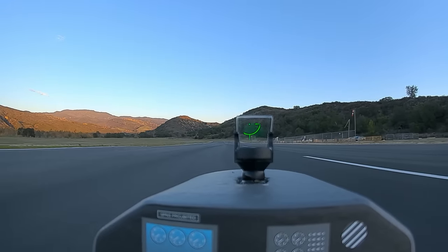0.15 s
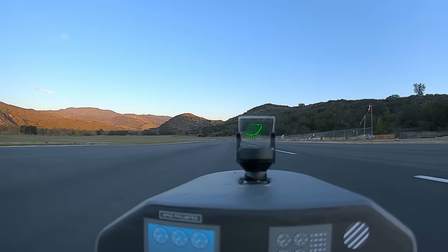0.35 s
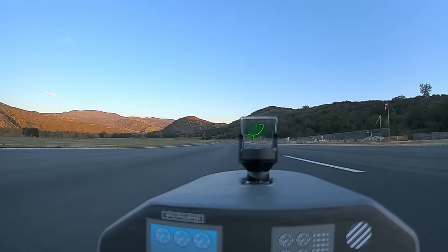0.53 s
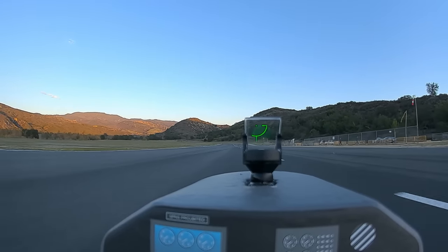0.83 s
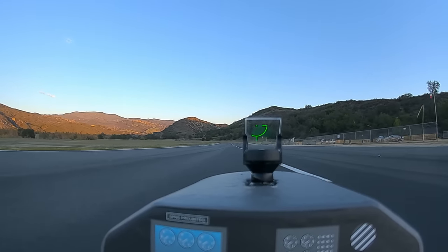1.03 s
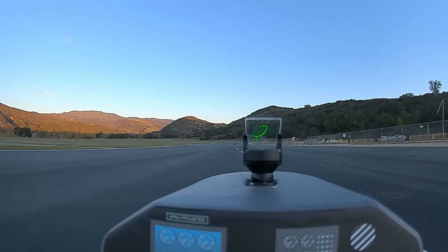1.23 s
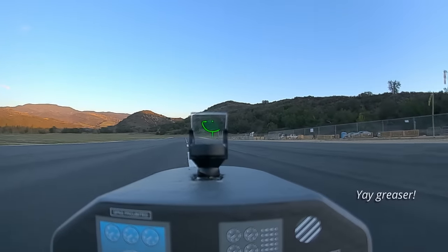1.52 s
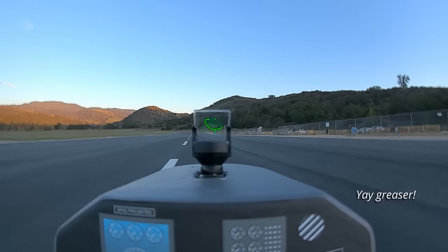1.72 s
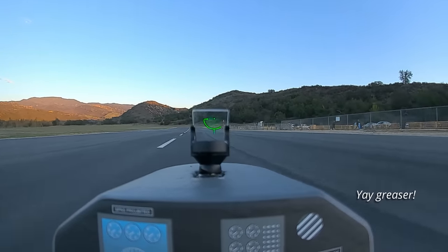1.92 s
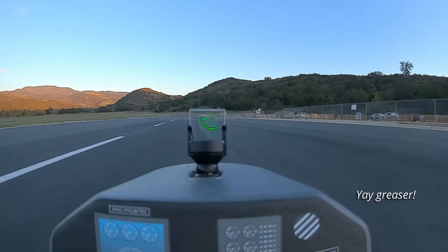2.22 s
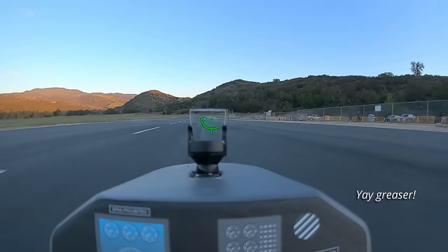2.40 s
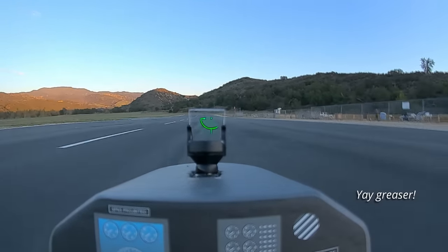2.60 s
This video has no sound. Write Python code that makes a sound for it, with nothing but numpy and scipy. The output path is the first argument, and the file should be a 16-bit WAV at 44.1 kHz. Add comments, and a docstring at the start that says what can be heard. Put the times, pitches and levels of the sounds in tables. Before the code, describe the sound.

Heard from inside a small model plane's hull outdoors, rapid low thumps of wheels skimming pavement turn into continuous gritty rolling, with ticking loose parts, faint air hiss, and hard jolts late on.

```python
"""Model jet landing, heard from inside

A small model jet lands on a rough paved runway, heard by a microphone inside its airframe. The wheels skip
about ten times a second, make their last skips up to about 1.8 s, then roll on unevenly without a break:
dense pushes of grit ring the hull modes, and bumps knock them. Loose parts tick, rattle and chatter as short
noise bursts and filtered random clicks. A faint airflow hiss of filtered noise, with a thin whistle in it,
lies under it all."""
import sys
import numpy as np
from scipy import signal
from scipy.io import wavfile

SR = 44100
rng = np.random.default_rng(int(sys.argv[2]) if len(sys.argv) > 2 else 0)


def transcribe(signal):
    """Save signal, clipped to [-1, 1], as a 16-bit WAV file at the path in sys.argv[1]."""
    frames = np.atleast_2d(signal).T
    limited = np.clip(frames, -1, 1)
    pcm = np.round(limited * 32767).astype(np.int16)
    wavfile.write(sys.argv[1], SR, pcm)


N = 121275  # length of the scene in samples

# Bumps that knock the gear. Each row: time of the peak in seconds, peak level in dB, contact length in ms.
KNOCK_EVENTS = [(0.157, -31.5, 3.2), (0.1808, -33.5, 1.36), (0.2082, -40.5, 4.3), (0.228, -44, 6.8),
                (0.3063, -30.0, 2), (0.3198, -30, 3.1), (0.3295, -35.0, 2.4), (0.4157, -36, 1.2),
                (0.4243, -29.5, 2.0), (0.4334, -33.5, 3.7), (0.4509, -34, 2.3), (0.523, -39, 3.5),
                (0.5362, -34.5, 2.7), (0.5503, -33, 2.7), (0.6087, -35.5, 1.9), (0.619, -33.5, 3.2),
                (0.627, -42, 1.5), (0.6377, -36, 2), (0.6517, -34, 3.1), (0.7698, -34, 2.1),
                (0.782, -49, 1.5), (0.8364, -36.5, 2.3), (0.8573, -38, 2.6), (0.8756, -41.0, 3.5),
                (0.9606, -37.0, 2.7), (0.974, -37.5, 4.7), (0.989, -46, 4.2), (1.045, -39.5, 4.3),
                (1.0746, -38, 0.89), (1.0885, -38, 1.4), (1.1499, -43, 7), (1.1662, -31.5, 4.5),
                (1.186, -36.5, 1.9), (1.2068, -42.5, 3.3), (1.2256, -40, 2.1), (1.2691, -29.5, 1.7),
                (1.2808, -41, 8.2), (1.2927, -35.5, 1.3), (1.3624, -32.5, 1), (1.3791, -38.5, 3.8),
                (1.4557, -37, 3.2), (1.4736, -31, 1.5), (1.4925, -45, 1), (1.5002, -37.5, 1.2),
                (1.5478, -38.5, 1.7), (1.5799, -38, 4.3), (1.594, -38, 0.78), (1.6102, -39.5, 5.2),
                (1.6733, -34, 4.9), (1.711, -36.5, 4.6), (1.731, -34.5, 3.5), (1.7455, -36, 3.4),
                (1.826, -33, 1.1), (1.8676, -37.5, 2.6), (1.904, -42, 2), (1.9353, -34, 1.3),
                (2.0512, -35, 1.4), (2.1366, -33, 2.3), (2.1639, -32.0, 4.6), (2.1769, -32.0, 4.5),
                (2.3416, -32, 2.9), (2.349, -32.5, 3.6), (2.3664, -27, 1.5), (2.3686, -18.5, 2.53),
                (2.375, -27, 4.6), (2.3903, -28, 2.1), (2.4174, -26.5, 1.5), (2.5262, -33.0, 2),
                (2.6265, -28.5, 1.6), (2.6518, -33, 0.63), (2.6543, -16, 2.1), (2.6598, -64, 1.3),
                (2.6688, -35, 2.6), (2.6742, -32, 2.4), (2.684, -22.5, 1.34), (2.6975, -32.0, 2.7),
                (2.7429, -28, 1.8)]
# Resonances of the hull. Each row: frequency in Hz, level in dB, time to die by 60 dB in seconds.
HULL_MODES = [(57.6, -9, 0.078), (108, -6, 0.023), (194, 5.65, 0.02), (348, 0.5, 0.021), (517.4, -7, 0.025),
              (667, -7.5, 0.017), (1560, -23.5, 0.0088)]
LOOSE_PATCHY_DB = 0.7  # flicker of each band in the rattle and the chatter


def amp(db):
    """Decibels to gain."""
    return 10 ** (np.asarray(db) / 20)


def rms_one(x):
    """Scale to unit rms."""
    return x / np.sqrt(np.mean(x ** 2) + 1e-20)


def drift(rate_hz):
    """Slow random wander of unit rms: noise through two equal one-pole low-passes."""
    step = 40  # computed on every 40th sample, then interpolated
    r = np.exp(-2 * np.pi * rate_hz * step / SR)
    settle = 2000  # start-up of the filter, thrown away
    noise = rng.standard_normal(N // step + settle + 2)
    slow = signal.lfilter([1], [1, -2 * r, r * r], noise)[settle:]
    return np.interp(np.arange(N) / step, np.arange(len(slow)), rms_one(slow))


def ring(force, hz, t60):
    """A resonance driven by a force: a unit click sets off a dying sine of height 1."""
    r = amp(-60 / (t60 * SR))
    w = 2 * np.pi * hz / SR
    return signal.lfilter([0, np.sin(w)], [1, -2 * r * np.cos(w), r * r], force + 1e-18)


def push(length_s, size):
    """A soft contact: one smooth hump of force, in an array of the given size."""
    t = np.arange(size) / SR
    return np.sin(np.pi * np.minimum(t / length_s, 1)) ** 2


def grains(per_s, spread_db):
    """Random clicks of uneven size and sign."""
    size_db = spread_db * np.minimum(rng.exponential(1, N), 5)
    sizes = amp(size_db) * rng.choice([-1, 1], N)
    return sizes * (rng.random(N) < per_s / SR)


def coloured(sources, spectrum, patchy_db):
    """Third-octave bands of two sources in turn, each with its own level and flicker; rms 1."""
    out = 0
    edges = 20 * 2 ** np.arange(0, 9.9, 1 / 3)
    hz, db = np.transpose(spectrum)
    for k, (low, high) in enumerate(zip(edges, edges[1:])):
        band_pass = signal.butter(2, [low, high], "band", fs=SR, output="sos")
        band = signal.sosfilt(band_pass, sources[k % 2])[-N:]
        level_db = np.interp(np.log(low * high) / 2, np.log(hz), db)
        out = out + amp(level_db + patchy_db * drift(9.3)) * band
    return rms_one(out)


def ground_contact():
    """Gain of wheel contact: brief skims, then a level curve of last skips and uneven rolling."""
    # Wheels skim the ground. Each row: start in seconds, length in seconds, level in dB.
    skims = [(0.034, 0.018, -45), (0.131, 0.061, -47), (0.288, 0.047, -47), (0.408, 0.034, -45),
             (0.512, 0.048, -51), (0.608, 0.065, -50), (0.741, 0.033, -46), (0.831, 0.048, -50),
             (0.939, 0.036, -45.5), (1.045, 0.036, -44.5), (1.145, 0.058, -46), (1.247, 0.054, -46),
             (1.355, 0.029, -44.5), (1.444, 0.061, -46.5)]
    # Level curve of the last skips, up to about 1.8 s, then of continuous uneven rolling.
    # Each row: time in seconds, level in dB, joined by straight lines.
    late_levels = [(1.52, -51), (1.542, -59.5), (1.614, -47.5), (1.642, -58), (1.66, -52), (1.752, -45.5),
                   (1.762, -59.5), (1.814, -47.5), (2.324, -47), (2.372, -40), (2.386, -49), (2.434, -39.5),
                   (2.56, -49.5), (2.64, -44.5), (2.646, -42.5), (2.75, -44.5)]
    rise_s, fall_s = 0.0048, 0.018  # straight rise, exponential fall of each skim
    fade_in_s = 0.066  # fade-in of the level curve, up to its first row

    t = np.arange(N) / SR
    power = 0
    for start, length, db in skims:
        rise = np.clip((t - start) / rise_s, 0, 1)
        fall = np.exp(-np.maximum(t - start - length, 0) / fall_s)
        power = power + (amp(db) * rise * fall) ** 2
    times, db = np.transpose(late_levels)
    fade_in = np.clip((t - times[0]) / fade_in_s + 1, 0, 1)
    late_contact = amp(np.interp(t, times, db)) * fade_in
    return np.sqrt(power + late_contact ** 2)


def rolling(contact):
    """Grit under the tyres: dense small pushes ringing the hull modes while the wheels touch."""
    # How strongly grit drives each hull mode, beyond the mode's own level. One value per mode, in dB.
    grit_drive = [7, 0, -4.5, -6, 8, 12.5, 5]
    grit_per_s, spread_db, contact_s = 900, 2, 0.00079

    out = 0
    for (hz, db, t60), drive_db in zip(HULL_MODES, grit_drive):
        clicks = rms_one(grains(grit_per_s, spread_db))
        grit = np.convolve(clicks, push(contact_s, size=200))[:N]
        # long rings pile up more, so each is evened out by its length
        mode = ring(grit * contact, hz, t60) / np.sqrt(t60 * SR) / 8
        out = out + amp(db + drive_db) * mode
    return out


def knocks():
    """Each bump is a soft push on the hull modes: a dip as the strut sinks, the hull's jerk and its ring."""
    scatter_db = 2  # random change of each mode from knock to knock
    sink_s, sink_db = 0.0069, -16  # length of the dip, and its depth relative to the peak

    out = np.zeros(N + SR)
    size, sink = SR // 8, int(sink_s * SR)
    scatter = rng.normal(0, scatter_db, (len(KNOCK_EVENTS), len(HULL_MODES)))
    for (peak_s, peak_db, contact_ms), extras in zip(KNOCK_EVENTS, scatter):
        force = push(contact_ms / 1000, size=size)
        motion = 0
        for (hz, db, t60), extra_db in zip(HULL_MODES, extras):
            motion = motion + amp(db + extra_db) * ring(force, hz, t60) / hz
        sound = np.diff(motion)
        top = np.argmax(sound[:200])  # the early peak lands on the listed time
        start = int(peak_s * SR) - top
        out[start:start + size - 1] += amp(peak_db) * sound / sound[top]
        out[start - sink:start] -= amp(peak_db + sink_db) * push(sink_s, size=sink)
    return out[:N]


def ticks():
    """Loose parts tick: a snap and a very short noise burst, brightest around its centre."""
    # Each row: start in seconds, peak level in dB, centre in Hz, width in octaves.
    tick_events = [(.1580, -53, 5600, 1.3), (0.1683, -49.5, 6030, 2), (0.3203, -57.5, 3500, 1),
                   (0.4266, -54, 6900, 1.7), (.5090, -53.5, 4700, 1.6), (.5478, -58.5, 5370, 0.58),
                   (.7742, -55, 6700, 1.1), (1.0564, -34, 1680, 1.95), (1.0780, -70, 5000, 1.5),
                   (1.6802, -61, 7000, 1.5), (2.2328, -58.5, 6960, 1.4), (2.3496, -37.5, 5900, 0.47),
                   (2.3606, -40.5, 5640, 0.61), (2.3653, -35.5, 3500, 2.2), (2.368, -35, 3000, 4.2),
                   (2.371, -41, 3930, 2.3), (2.3747, -52, 4500, 0.57), (2.381, -65, 6000, 1.1),
                   (2.628, -58, 4000, 1.5), (2.6433, -54, 4000, 1.6), (2.65, -36.5, 3480, 2.5),
                   (2.6525, -32, 2480, 3.5), (2.6560, -35, 1400, 0.47), (2.657, -43, 4000, 1.1),
                   (2.6624, -54, 4500, 0.66), (2.6679, -65, 4500, .9), (2.673, -47, 4470, 0.53),
                   (2.683, -37.5, 1630, 3.9), (2.6825, -51, 4530, 2.4), (2.6870, -49, 4000, 2.6)]
    rise_s, t60_s = 0.00056, 0.006
    snap_db = 9.5  # one sharp click added at the end of the rise
    body_hz, body_db = 1670, 10.5  # dull part, heard as a thud in wide ticks: its upper edge and strength

    out = np.zeros(N + SR)
    t = np.arange(1000) / SR
    noises = rng.standard_normal((len(tick_events), len(t)))
    for (start_s, peak_db, hz, octaves), noise in zip(tick_events, noises):
        burst = noise * np.minimum(t / rise_s, 1) * amp(-60 * t / t60_s)
        burst[int(rise_s * SR)] += amp(snap_db)
        body = signal.lfilter(*signal.butter(1, body_hz, fs=SR), burst)
        burst = burst + amp(body_db) * body
        edges = hz * 2. ** (np.array([-.5, .5]) * octaves)
        edges = np.minimum(edges, .45 * SR)
        sound = signal.sosfilt(signal.butter(2, edges, "band", fs=SR, output="sos"), burst)
        start = int(start_s * SR)
        out[start:start + len(t)] += amp(peak_db) * sound / np.abs(sound).max()
    return out[:N]


def rattle(contact):
    """Fine rattle shaken loose while the wheels touch: uneven clicks that follow the contact gain."""
    # Colour of the rattle. Each row: frequency in Hz, relative level in dB per Hz.
    rattle_colour = [(900, 9), (1550, 11.5), (2200, -14), (3000, -16), (4000, -2), (5100, -11.5),
                     (6600, -22), (8500, -15), (15000, -33)]
    level_db = -21  # relative to the contact gain
    shaken = grains(per_s=2200, spread_db=6)
    return amp(level_db) * contact * coloured([shaken, shaken], rattle_colour, LOOSE_PATCHY_DB)


def chatter():
    """Knocks leave loose parts chattering: uneven clicks that start with each knock and die away."""
    # Colour of the chatter. Each row: frequency in Hz, relative level in dB per Hz.
    chatter_colour = [(700, -0.5), (1500, 8.5), (2500, -8.5), (3300, -13.5), (5000, -8), (8000, -20.5),
                      (15000, -36)]
    level_db, t60_s = -35, 0.14  # level relative to the knock's peak

    jolts = np.zeros(N)  # as power, so that overlapping knocks add up
    for peak_s, peak_db, _ in KNOCK_EVENTS:
        jolts[int(peak_s * SR)] = amp(2 * (peak_db + level_db))
    power_decay = amp(-120 / (t60_s * SR))
    shake = np.sqrt(signal.lfilter([1], [1, -power_decay], jolts))
    loose = grains(per_s=6000, spread_db=2.5)
    return shake * coloured([loose, loose], chatter_colour, LOOSE_PATCHY_DB)


def airflow():
    """Air over the hull: flickering coloured noise, and noise through one narrow resonance as a whistle."""
    # Colour of the hiss. Each row: frequency in Hz, relative level in dB per Hz.
    air_colour = [(22, -17), (32, -26), (59, -3), (124, -2.5), (189, -4.5), (303, -7.5), (632, -12),
                  (1010, -25), (1540, -15.5), (2100, -34), (3000, -53), (4000, -30.5), (5100, -48),
                  (6600, -35.5), (8300, -61), (11000, -47.5), (15500, -55.5)]
    air_db, air_patchy_db = -55, 0.9
    whistle_hz, whistle_t60_s = 6660, 0.029
    whistle_db, whistle_drift_db = -93, 3.2

    noises = rng.standard_normal((2, N + SR // 4))  # the extra start lets the band filters settle
    hiss = amp(air_db) * coloured(noises, air_colour, air_patchy_db)
    whistle = rms_one(ring(rng.standard_normal(N), whistle_hz, whistle_t60_s))
    return hiss + amp(whistle_db + whistle_drift_db * drift(6)) * whistle


def scene():
    """Grit, knocks, ticks, rattle, chatter and airflow, all at one microphone."""
    contact = ground_contact()
    wheels = rolling(contact) + knocks()
    loose_parts = ticks() + rattle(contact) + chatter()
    return (wheels + loose_parts + airflow())[None]


def record(dry):
    """The lowest rumble and the top are cut, the top steeply."""
    low_cut_hz, top_cut_hz = 22, 15800
    high_pass = signal.butter(3, low_cut_hz, "high", fs=SR, output="sos")
    low_pass = signal.ellip(10, .5, 60, top_cut_hz, fs=SR, output="sos")
    return signal.sosfilt(low_pass, signal.sosfilt(high_pass, dry))


dry = scene()
out = record(dry)
transcribe(out)
```